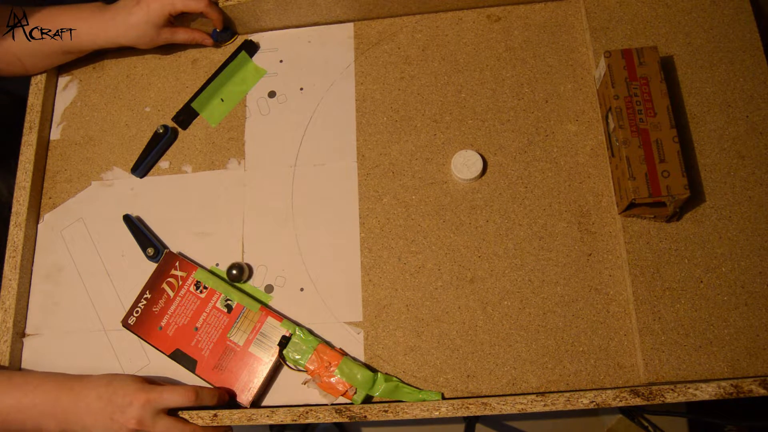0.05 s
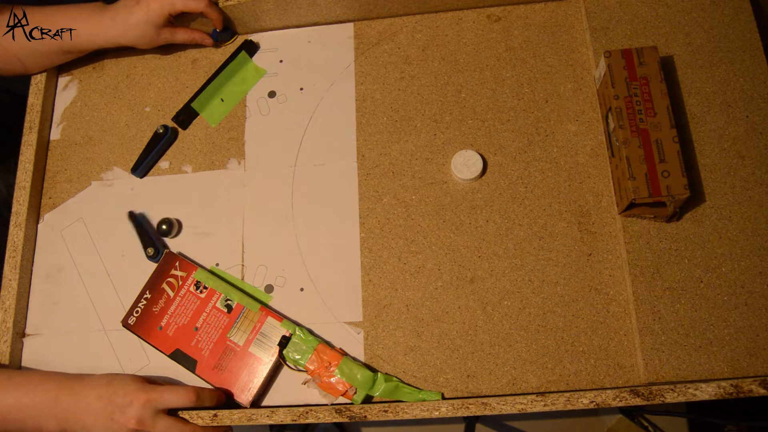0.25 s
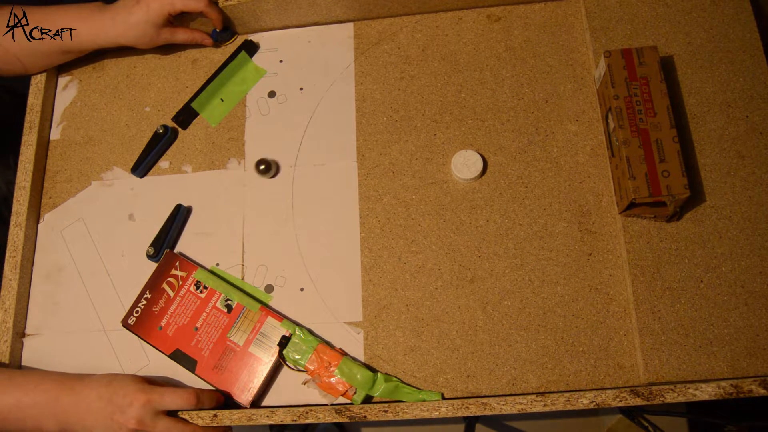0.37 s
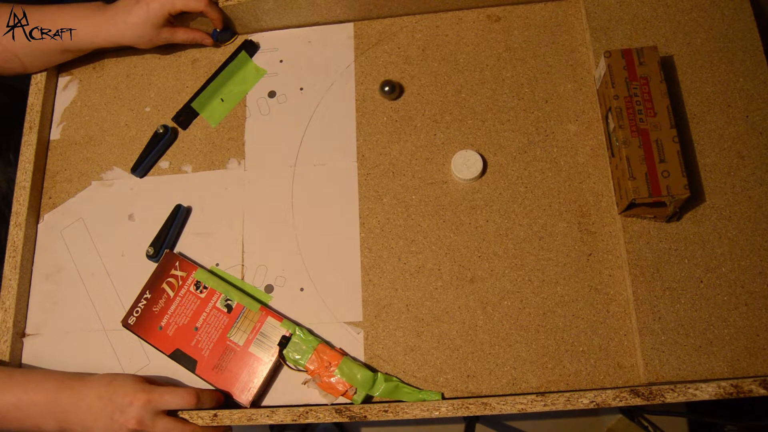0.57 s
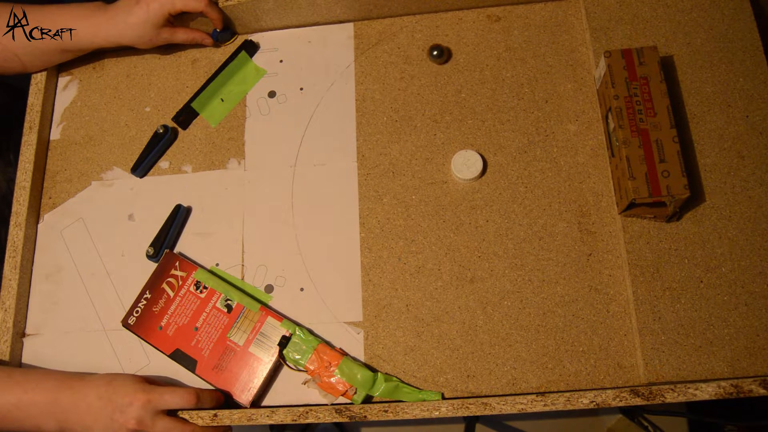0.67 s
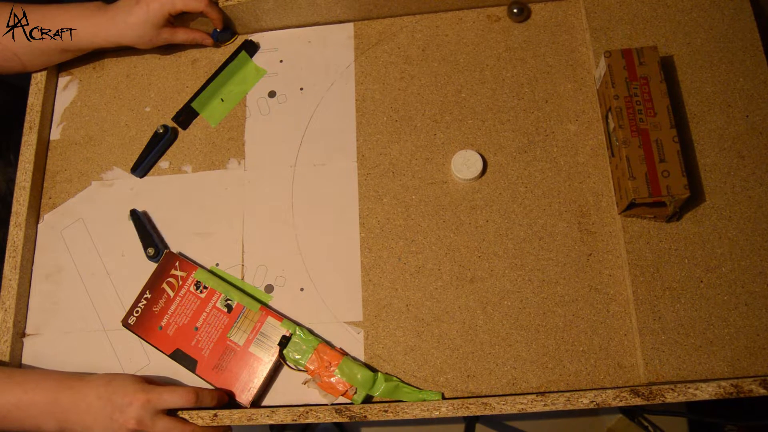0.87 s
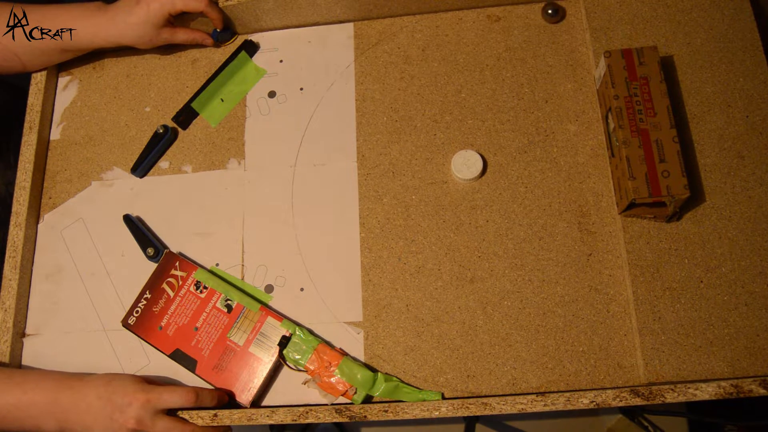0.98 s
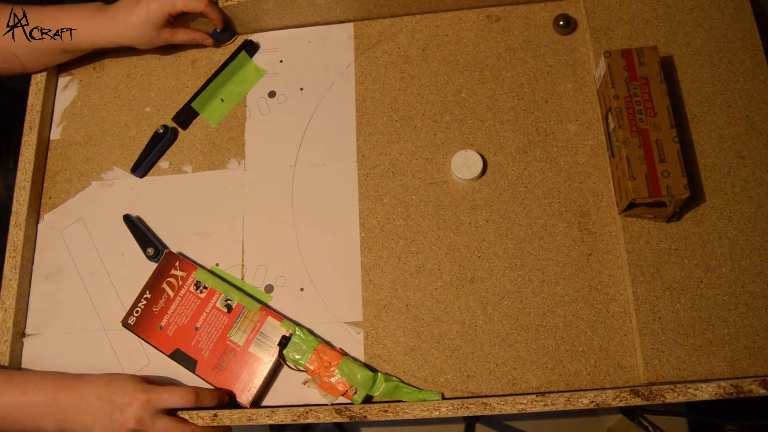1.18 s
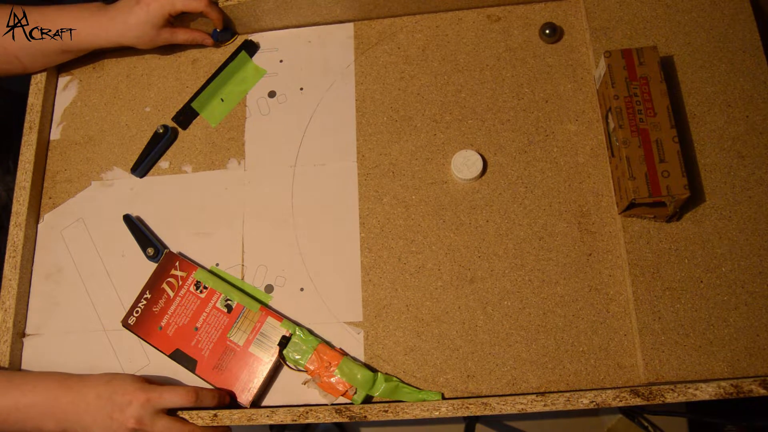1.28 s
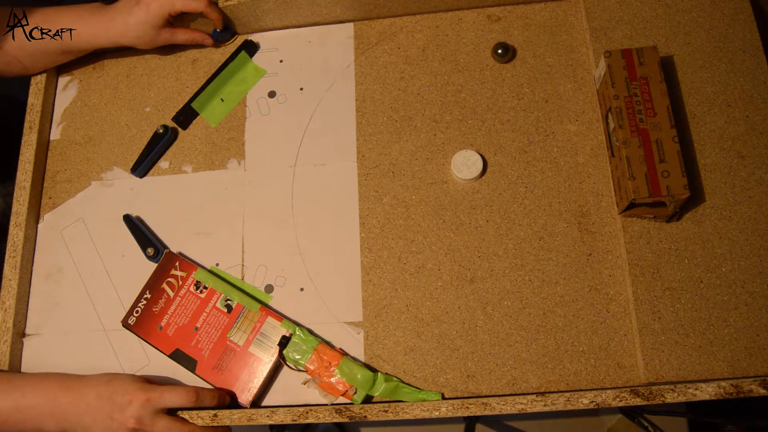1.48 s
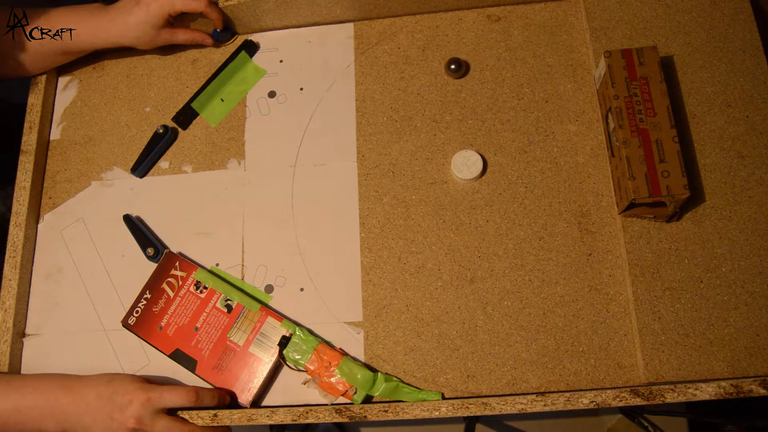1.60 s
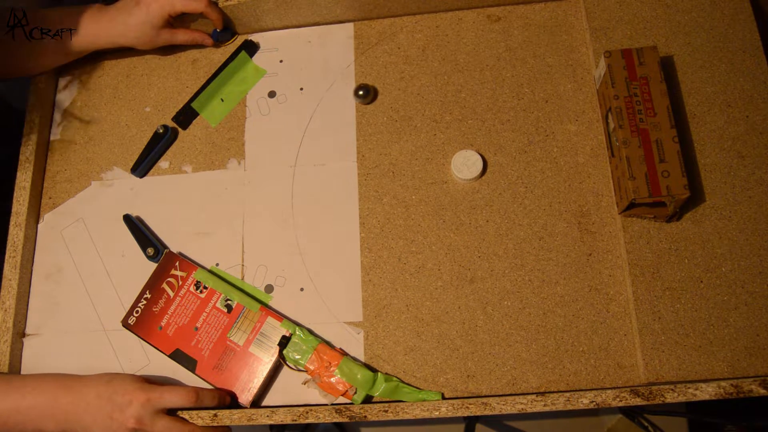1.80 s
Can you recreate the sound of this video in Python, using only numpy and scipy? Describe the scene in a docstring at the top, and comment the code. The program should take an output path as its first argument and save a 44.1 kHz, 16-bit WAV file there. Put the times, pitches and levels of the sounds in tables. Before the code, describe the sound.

A flipper snaps a metal ball, which rolls and knocks across a wooden pinball board.

```python
"""A steel ball rolls over a home-made wooden pinball board in a quiet room.
The grain jolts the ball, driving the board's resonances into a rumble. The flipper's linkage clicks;
the flipper snaps against the ball, squeaks, knocks on its stop, then falls back with a clack.
The ball bumps the far rim, which sets the board booming, slows, and rolls back down.
Each impact excites damped modes of wood or plastic, and the room adds a short diffuse tail."""
import sys
import numpy as np
from scipy import signal
from scipy.fft import rfft, irfft
from scipy.io import wavfile
from scipy.ndimage import uniform_filter1d

SR = 44100
rng = np.random.default_rng(int(sys.argv[2]) if len(sys.argv) > 2 else 0)


def store_wav(level_fs):
    """Save 16-bit WAV to argv[1]."""
    pcm = np.round(np.clip(np.atleast_2d(level_fs), -1, 1) * 32767)
    wavfile.write(sys.argv[1], SR, pcm.T.astype(np.int16))


N = 81585
RING_T = np.arange(int(.6 * SR)) / SR  # seconds after a blow

# The rumble follows the ball's speed. Each row: time in seconds, level in dB.
RUMBLE_LEVEL = [(0, -31), (0.069, -37.5), (.138, -33.5), (.24, -32), (.3, -38.5), (.4, -26), (.5, -26.5),
                (.575, -36), (.6, -26), (.72, -27.5), (.84, -28), (1.0, -30), (1.099, -34), (1.2, -42),
                (1.28, -51), (1.45, -36), (1.55, -35.5), (1.57, -29.5), (1.62, -33), (1.648, -27),
                (1.771, -33), (1.822, -29.5)]
# Broad spectrum of the rumble. Each row: frequency in Hz, relative density in dB.
RUMBLE_SPECTRUM = [(30, -42), (60, -10.5), (115, -4), (210, -12.5), (330, 2), (470, -2.5), (580, -3.5),
                   (950, -19.5), (1400, -26), (2500, -28.5), (5000, -48), (14000, -41.5)]
# Board resonances driven by rolling. Each row: frequency in Hz, bandwidth in Hz, relative level in dB.
RUMBLE_RESONANCES = [(125.2, 11, -7), (287.4, 28, -11), (319.3, 23.8, -6), (380.3, 36, -7), (448.5, 56, -6)]
# Whirr of a fast ball. Each row: time in seconds, level relative to the rumble in dB.
WHIRR_LEVEL = [(0, -5.5), (.3, -21), (.5, -8.5), (.75, -8.5), (1.0, -8), (1.3, -16.5), (1.7, -9.5)]
# Bass drone of the board as the ball crosses it. Each row: time in seconds, level in dB.
DRONE_LEVEL = [(0, -42), (.12, -37.5), (.24, -29), (.31, -34), (.5, -36), (.62, -43), (.78, -52),
               (1.4, -59.5), (1.718, -40), (1.85, -60)]
# Background hiss. Each row: frequency in Hz, relative density in dB.
HISS_SPECTRUM = [(30, -11.5), (130, 28), (400, 15.5), (1200, -2), (3000, -6.5), (7000, -10.5), (10000, -7),
                 (15000, -13)]
# Faint steady tones. Each row: frequency in Hz, level in dB.
FAINT_TONES = [(872, -54.5), (5362, -72), (10099, -67)]
# Light contacts of linkage and ball. Each row: start in seconds, level in dB, centre in Hz,
# width in octaves, T60 (time to decay by 60 dB) in seconds.
LIGHT_CONTACTS = [(.066, -42, 2340, 0.85, 0.069), (0.1907, -34, 9940, 0.3, 0.02),
                  (.191, -43, 2500, 1.1, 0.18), (0.3117, -23.5, 12000, 0.3, 0.027),
                  (0.314, -35.5, 2980, 1.7, 0.1), (0.3166, -24.5, 12600, 0.27, 0.018),
                  (0.322, -20.5, 1920, 1.6, 0.14), (.556, -47.5, 11000, 1.1, 0.0089),
                  (0.714, -45.5, 7100, 1.2, 0.096), (0.8556, -20.5, 10900, 0.28, 0.047),
                  (0.8575, -32.5, 2200, 0.93, 0.28), (0.8606, -26, 11700, 0.17, 0.012),
                  (0.874, -27, 9000, 1.4, 0.041), (.8858, -30, 10000, 0.53, 0.0042),
                  (.935, -25.5, 9380, 0.041, 0.016), (0.9391, -24.5, 6600, 2.2, 0.17),
                  (0.952, -27.5, 6800, 6, 0.19), (1.013, -40.5, 8400, 0.17, 0.057),
                  (1.0472, -43.5, 4630, 0.99, 0.039), (1.125, -44.5, 6520, 2.4, 0.086),
                  (1.502, -52, 9500, 0.12, 0.014), (1.608, -40.5, 9400, 0.17, 0.014),
                  (1.609, -48.5, 2400, 2.1, 0.037), (1.792, -54.5, 3500, 4.3, 0.063)]
# Blows on the wood. Each row: start in seconds, level in dB, low-pass in Hz, high-pass in Hz.
WOOD_BLOWS = [(0.212, -24, 830, 203), (0.2185, -30.5, 1490, 244), (0.3222, -26.5, 1500, 199),
              (.336, -26, 1780, 413), (.379, -11.5, 615, 385), (.392, -20, 530, 282),
              (0.469, -21, 520, 260), (0.595, -27, 565, 390), (0.8735, -21, 2700, 610),
              (.8855, -7, 1670, 300), (0.8885, -6.5, 1570, 1150), (.904, -13.5, 1180, 400),
              (.937, -21.5, 1540, 303), (1.139, -27, 326, 120), (1.503, -34, 420, 284),
              (1.629, -35.5, 650, 400), (1.642, -28, 420, 250), (1.796, -29.5, 385, 280)]
# Distinct modes of the board. Each row: frequency in Hz, relative level in dB, T60 in seconds.
BOARD_MODES = [(287.8, -5, 0.48), (322.6, 2.5, 0.29), (376.4, -5.5, 0.27), (546, -26, 0.42), (632, 2, 0.27),
               (730.5, -4.5, 0.19), (807.5, 0.5, 0.25), (900, -18.5, 0.26), (923, -7, 0.14),
               (1016, -0.5, .25), (1190, 5.5, 0.15), (1240, -4.5, 0.28), (1414, -12, 0.36),
               (1550, -35, 0.32), (1677, -11, 0.24)]
# Its overlapping modes. Each row: frequency in Hz, relative density in dB, T60 in seconds.
BOARD_BANDS = [(60.5, 15.5, 0.084), (246, 0, 0.0504), (560, 1, 0.066), (1360, 1.5, 0.073),
               (2160, -12, 0.14), (4040, -14.5, 0.19), (9050, -12, 0.063), (15000, -19.5, 0.017)]
# Flipper on ball, then on stop. Each row: start in seconds, dense ring in dB, clear ring in dB.
FLIPPER_BLOWS = [(0.3314, -15.5, -23), (0.3356, -6.5, -19.5), (0.338, -13, -22.5), (0.3786, -17.5, -16)]
# Overlapping flipper modes. Each row: frequency in Hz, relative density in dB, T60 in seconds.
PLASTIC_BANDS = [(62, -1, 0.21), (302, -3, 0.045), (547, -5.5, 0.73), (1815, -3, 0.15), (2600, -3.5, 0.12),
                 (3480, 1.5, 0.12), (3870, -6.5, 0.09), (4860, -2, 0.072), (7400, -4.5, .12),
                 (9630, 1.5, 0.15), (11720, -4.5, 0.15), (12660, -12, .145), (16000, -20, .15)]
# Distinct flipper modes. Each row: frequency in Hz, relative level in dB, T60 in seconds.
PLASTIC_MODES = [(1421, -2, .3), (1530, 3, .26), (1809, -1, .2), (1914, 0, .24), (2056, -3, .2),
                 (2480, -1, .2), (2781, 1, .17), (2826, -2, .17), (3490, -4, .08), (3813, -6, .17),
                 (5453, -7, .2), (6062, -7, .18), (6592, -5, .17)]
# Booms of the board. Each row: start in seconds, level in dB, fundamental in Hz, T60 in seconds.
HEAVY_BLOWS = [(0.333, -30, 85.3, 0.37), (0.461, -22.5, 60.2, 0.75), (0.889, -18, 99.4, 0.39),
               (1.137, -17, 90, 0.39)]
# Modes of the pivot. Each row: frequency in Hz, relative level in dB, T60 in seconds.
PIVOT_MODES = [(11090, -6, .17), (11160, -3, .16), (11228, 0, .22)]
# Thuds on the flipper's stop. Each row: start in seconds, level in dB.
STOP_HITS = [(.3792, -20.5), (.3827, -20.5)]
# Modes of the rim. Each row: frequency in Hz, relative level in dB, T60 in seconds.
RIM_MODES = [(329.5, 0, 0.12), (484, 5, .05), (588, -6.5, 0.21), (707, -1, 0.2), (1002, 2, 0.18),
             (1130, 1.5, 0.15), (1165, 3.5, 0.23), (1225, -1.5, 0.22), (1227, -5.5, 0.13), (1373, 0, 0.07),
             (2147, -4.5, 0.095), (3710, -6.5, 0.038), (4400, -17, 0.073)]
# Reverberation of the room. Each row: frequency in Hz, relative gain in dB, T60 in seconds.
ROOM = [(60, 11.5, .97), (406, 2, .13), (2110, 6, .27), (5970, 1, .33), (9950, -3, .36),
        (15260, -20.5, .14)]


def from_db(db):
    """Decibels to amplitude ratio."""
    return 10 ** (np.asarray(db) / 20)


def rms_one(x):
    """Scale to an rms of 1."""
    return x / np.sqrt(np.mean(x ** 2) + 1e-20)


def unit_hit(x):
    """Scale to the energy of 10 ms at an rms of 1."""
    return x * np.sqrt(.01 * SR / (np.sum(x ** 2) + 1e-20))


def at_hz(table, hz, column=1):
    """Interpolate a column on a log-frequency axis."""
    table = np.array(table)
    return np.interp(np.log(np.maximum(hz, 1)), np.log(table[:, 0]), table[:, column])


def colour(x, spectrum):
    """Spectral shaping of a steady signal; rms 1."""
    gain = from_db(at_hz(spectrum, np.fft.rfftfreq(len(x), 1 / SR)))
    return rms_one(irfft(rfft(x) * gain, len(x)))


def cut(x, hz, kind, order=2):
    """Butterworth low-, high- or band-pass filter."""
    return signal.sosfilt(signal.butter(order, hz, kind, fs=SR, output="sos"), x)


def resonate(x, hz, width_hz):
    """Two resonators in cascade give one peak with steep skirts; rms 1."""
    b, a = signal.iirpeak(hz, hz / width_hz, fs=SR)
    return rms_one(signal.lfilter(b, a, signal.lfilter(b, a, x)))


def level(curve):
    """Interpolate a dB curve into a gain at every sample."""
    return from_db(np.interp(np.arange(N) / SR, *np.transpose(curve)))


def steady(x, curve):
    """Drop the run-in, divide by the running rms and impose a level curve."""
    x = x[-N:]
    return x / np.sqrt(uniform_filter1d(x ** 2, size=2000) + 1e-9) * level(curve)


def add(out, start_s, x):
    """Superpose a sound at its start time."""
    i = int(start_s * SR)
    out[i:i + len(x)] += x[:len(out) - i]


def fade(t60):
    """Exponential decay by 60 dB in t60 seconds."""
    return np.exp(-np.log(1000) * RING_T / t60)


def crack():
    """Attack transient: extra gain in the first milliseconds of a blow."""
    return 1 + from_db(-2) * fade(t60=.015)


def dense_ring(bands):
    """Modal overlap: crowded modes merge into half-octave noise bands, each with its own decay."""
    hz = np.fft.rfftfreq(len(RING_T), 1 / SR)
    spectrum = np.exp(2j * np.pi * rng.random(len(hz))) * from_db(at_hz(bands, hz))
    edges = np.geomspace(40, 18000, 19)
    ring = np.zeros(len(RING_T))
    for low, high in zip(edges, edges[1:]):
        band = irfft(spectrum * (hz >= low) * (hz < high), len(RING_T))
        ring += band * fade(at_hz(bands, np.sqrt(low * high), column=2))
    return unit_hit(ring)


def clear_ring(modes, spread_db=2):
    """Free vibration as damped sines; each blow lands elsewhere and favours other modes."""
    ring = np.zeros(len(RING_T))
    for k, (hz, db, t60) in enumerate(modes):
        amplitude = (-1) ** k * from_db(db + spread_db * rng.standard_normal())
        ring += amplitude * np.sin(2 * np.pi * hz * RING_T) * fade(t60)
    return unit_hit(ring)


def bumps(per_second=1800):
    """Shot noise: random jolts from the grain, with a run-in to let resonances build."""
    count = N + len(RING_T)
    return rng.choice([-1, 1], count) * (rng.random(count) < per_second / SR)


def rolling(drone_hz=85, drone_width_hz=30.5, overtone_ratio=1.97):
    """Forced vibration: the ball's jolts on the grain drive the board's resonances."""
    rumble = from_db(-2) * colour(bumps(), RUMBLE_SPECTRUM)
    rumble += sum(from_db(db) * resonate(bumps(), hz, width) for hz, width, db in RUMBLE_RESONANCES)
    whirr = cut(bumps(), hz=[526, 1002], kind="band", order=4)
    whirr = steady(whirr, RUMBLE_LEVEL) * level(WHIRR_LEVEL)
    drone = resonate(bumps(), drone_hz, drone_width_hz)
    drone += from_db(-7.5) * resonate(bumps(), overtone_ratio * drone_hz, overtone_ratio * drone_width_hz)
    return steady(rumble, RUMBLE_LEVEL) + whirr + steady(drone, DRONE_LEVEL)


def background():
    """The noise floor: stationary hiss and faint pure tones."""
    t = np.arange(N) / SR
    hiss = from_db(-43) * colour(rng.standard_normal(N), HISS_SPECTRUM)
    return hiss + sum(from_db(db) * np.sqrt(2) * np.sin(2 * np.pi * hz * t) for hz, db in FAINT_TONES)


def clicks(skirt=2.2):
    """Impulse response: each light contact rings briefly in one broad treble resonance."""
    out = np.zeros(N)
    hz = np.fft.rfftfreq(len(RING_T), 1 / SR) + 1
    for start, db, centre_hz, octaves, t60 in LIGHT_CONTACTS:
        peak = (1 + (np.log2(hz / centre_hz) / octaves) ** 2) ** (-skirt / 2)
        noise = irfft(peak * np.exp(2j * np.pi * rng.random(len(hz))), len(RING_T))
        low_edge_hz = max(centre_hz / 2 ** (3 * octaves), 10)  # three widths below the centre
        add(out, start, from_db(db) * unit_hit(cut(noise * fade(t60), low_edge_hz, "high")))
    return out


def knocks():
    """Impact excitation: flipper and ball strike the wood; softer contacts excite less treble."""
    out = np.zeros(N)
    for start, db, low_pass_hz, high_pass_hz in WOOD_BLOWS:
        wood = from_db(-2.5) * clear_ring(BOARD_MODES) + from_db(2) * dense_ring(BOARD_BANDS)
        dulled = cut(wood * crack(), low_pass_hz, "low")
        add(out, start, from_db(db) * unit_hit(cut(dulled, high_pass_hz, "high")))
    return out


def flipper_snaps():
    """Broadband excitation: a quick run of hard contacts rings the plastic flipper brightly."""
    out = np.zeros(N)
    for start, dense_db, clear_db in FLIPPER_BLOWS:
        add(out, start, from_db(dense_db) * dense_ring(PLASTIC_BANDS) * crack())
        add(out, start, from_db(clear_db) * clear_ring(PLASTIC_MODES))
    return out


def booms(overtone_ratio=1.6):
    """Plate bending: heavy blows flex the whole board in its two lowest modes."""
    out = np.zeros(N)
    for start, db, hz, t60 in HEAVY_BLOWS:
        phase = 2 * np.pi * hz * RING_T
        overtone = from_db(-6) * np.sin(overtone_ratio * phase) * fade(.82 * t60)
        add(out, start, from_db(db) * unit_hit(np.sin(phase) * fade(t60) + overtone))
    return out


def pivot_squeak(start_s=.3755, hz=11215, rise_s=.0051, hold_s=.0023, fall_s=.0041):
    """Friction excites a brief high tone at the end of the swing and leaves the pivot ringing."""
    t = np.arange(N) / SR - start_s
    swell = np.interp(t, np.cumsum([0, rise_s, hold_s, fall_s]), [0, 1, 1, 0])
    out = from_db(-3.5) * swell * np.sin(2 * np.pi * hz * t)
    add(out, start_s + rise_s + hold_s, from_db(-20.5) * clear_ring(PIVOT_MODES))
    return out


def stop_thuds(hz=610, t60=.05):
    """Heavy damping: the flipper's stop sounds one short-lived mode, a hollow thud."""
    out = np.zeros(N)
    thud = unit_hit(np.sin(2 * np.pi * hz * RING_T) * fade(t60))
    for start, db in STOP_HITS:
        add(out, start, from_db(db) * thud)
    return out


def rim_bump(start_s=1.125):
    """Coupled vibration: the ball strikes the wooden rim, which rings hollow; the board joins in."""
    out = np.zeros(N)
    board = from_db(-8.5) * unit_hit(cut(dense_ring(BOARD_BANDS), hz=1960, kind="low"))
    add(out, start_s, from_db(-22) * (clear_ring(RIM_MODES) + board))
    return out


def room(x, delay_s=.009, frame=512):
    """Reverberation: a small room stores energy at each frequency and returns a diffuse, dying tail."""
    hz, t, spectra = signal.stft(x, SR, nperseg=frame)
    retention = from_db(-60 * t[1] / at_hz(ROOM, hz, column=2)) ** 2  # energy kept per time step
    energy = np.array([signal.lfilter([1 - kept], [1, -kept], np.abs(row) ** 2)
                       for kept, row in zip(retention, spectra)])
    noise = signal.stft(rng.standard_normal(N), SR, nperseg=frame)[2]
    diffuse = noise / np.std(noise) * np.sqrt(energy) * from_db(at_hz(ROOM, hz))[:, None]
    tail = signal.istft(diffuse, SR, nperseg=frame)[1]
    out = np.zeros(N)
    add(out, delay_s, from_db(-10.5) * tail)
    return out


def scene():
    """Superposition: the contacts and their reverberation, over booms, rolling and background."""
    hits = knocks() + flipper_snaps() + stop_thuds() + clicks() + pivot_squeak() + rim_bump()
    return (hits + room(hits) + booms() + rolling() + background())[None]


def record(dry, knee=6, cutoff_hz=15800):
    """Band limiting and saturation: the microphone rolls off both ends, peaks overload, the top is cut."""
    heard = cut(dry, hz=11770, kind="low")
    heard = cut(heard, hz=46.2, kind="high")
    clipped = heard / (1 + np.abs(heard) ** knee) ** (1 / knee)
    return signal.sosfilt(signal.ellip(10, .1, 70, cutoff_hz, fs=SR, output="sos"), clipped)


dry = scene()
out = record(dry)
store_wav(out)
```